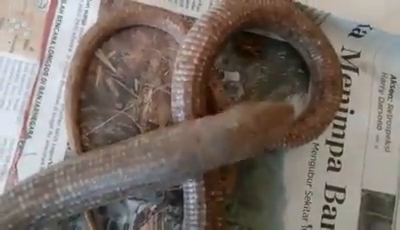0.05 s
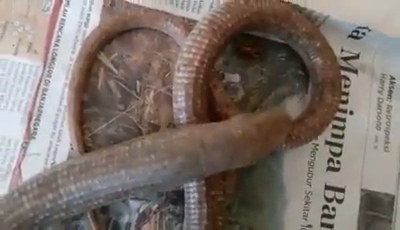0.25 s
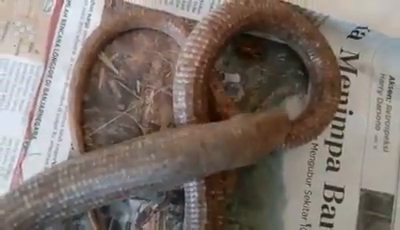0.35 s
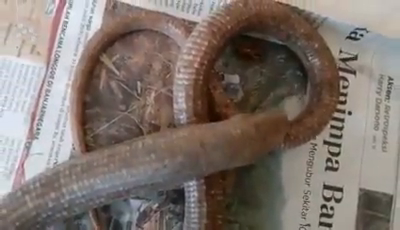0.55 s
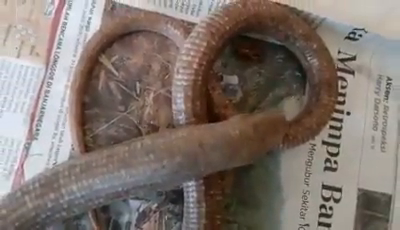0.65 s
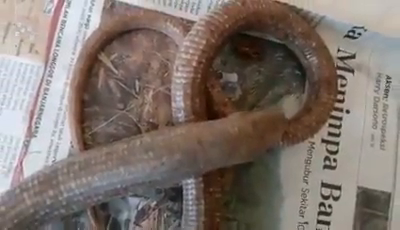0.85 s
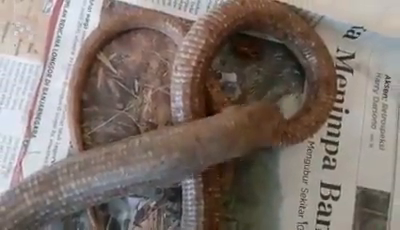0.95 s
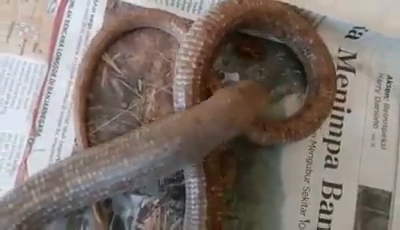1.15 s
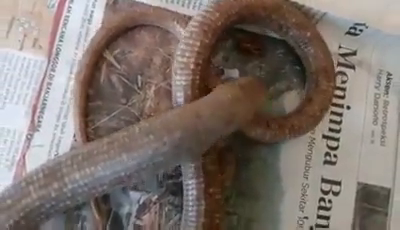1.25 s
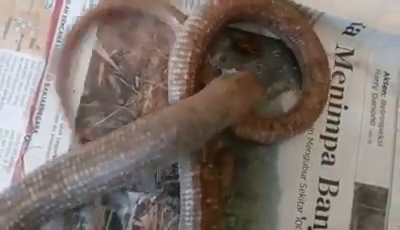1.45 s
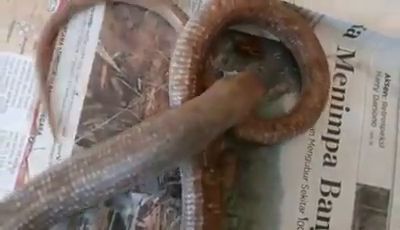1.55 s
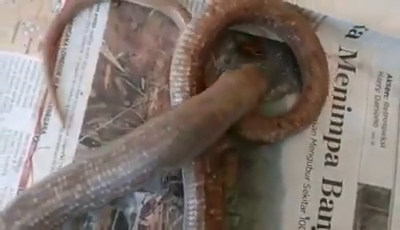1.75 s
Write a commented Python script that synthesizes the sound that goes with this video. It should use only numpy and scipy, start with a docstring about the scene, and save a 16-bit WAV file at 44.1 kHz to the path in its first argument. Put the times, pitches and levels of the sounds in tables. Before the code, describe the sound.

Newspaper crackles close by in a quiet room as a legless lizard tugs at its food. Light ticks build into sharp, crisp snaps, densest from about 0.3 to 0.7 seconds. The crackling thins, with another snap around 1 second and a few small ones after. From about 1.2 seconds the scaly body slides over the paper with a smoother hiss and faint low rub, peaking near 1.55 seconds, then easing.

```python
"""Paper crackles and snaps in short bursts, close by in a quiet room: a long legless lizard is
tugging at its food on a sheet of newspaper. Each buckling fold sends an impulse through the
resonances of the sheet, and tearing fibres add a fine hiss. Then the scaly body slides over the
paper, and friction makes a smoother hiss with a faint low rub."""
import sys
import numpy as np
from scipy import signal
from scipy.fft import rfft, irfft, next_fast_len
from scipy.io import wavfile
from scipy.ndimage import uniform_filter1d, minimum_filter1d

SR = 44100
rng = np.random.default_rng(int(sys.argv[2]) if len(sys.argv) > 2 else 0)


def store_pcm(level_fs):
    """Save levels as 16-bit WAV."""
    pcm = np.round(np.clip(level_fs, -1, 1) * 32767).astype(np.int16)
    wavfile.write(sys.argv[1], SR, np.atleast_2d(pcm).T)


N = 79380
TIME = np.arange(N) / SR

# Snaps of the paper. Each row: time in seconds, relative level in dB, extra low-mids in dB,
# extra fibre hiss in dB, decay time in seconds, pitch of the buckling fold in Hz.
SNAP_EVENTS = [(0.056, -21, -9, 3, 0.0012, 4500), (0.1658, -18.5, 2, 1, 0.0017, 3800),
               (0.2026, -20, -4, 6, 0.0027, 3610), (0.209, -12, 1, 1, 0.0009, 4530),
               (0.2506, -17, -6, -2, 0.001, 4640), (0.2639, -9.5, -3, 1, 0.0012, 4170),
               (0.2705, -9, 2, -3, 0.0009, 4350), (0.278, -11.5, 5, 3, 0.0037, 3120),
               (0.29, -11.5, -3, 2, 0.001, 4440), (0.325, -22.5, -2, -7, 0.0011, 4380),
               (0.3532, -6, -4, -1, 0.0041, 4500), (0.357, -6.5, 8, -7, 0.00057, 3930),
               (0.3721, -10, -11, -9, 0.00072, 4170), (0.374, -12, 2, -5, 0.0023, 4000),
               (0.386, -7.5, -2, -2, 0.0028, 4460), (0.4069, -8, 5.5, 6, 0.0013, 4460),
               (0.4157, -12, 4, 7, 0.002, 4400), (0.427, -5, 1.5, 5, 0.0024, 5350),
               (0.4335, -14, -2, -2, 0.0024, 4000), (0.451, -1.5, 1, -12, 0.0019, 4040),
               (0.453, 1.5, -5, 5, 0.0026, 4380), (0.4749, -2.5, -4, 5, 0.0025, 4600),
               (0.52, -15, 7, 5, 0.006, 4300), (0.5496, -15, 17, -6, 0.005, 4500),
               (0.555, -3.5, 2, -8, 0.0037, 5330), (0.558, -4.5, 1, -6, 0.0031, 4360),
               (0.567, -10, -8, -3, 0.0018, 3400), (0.573, -6, -3, -1, 0.0018, 3540),
               (0.6045, -14.5, 2, -3, 0.0012, 4470), (0.609, -13, 2, -3, 0.0016, 4300),
               (0.6194, -5, -2, -8, 0.0033, 4130), (0.627, -8.5, 13, -4, 0.0041, 4480),
               (0.633, -10, 11, 5, 0.0031, 4430), (0.6374, -13, 14.5, -7, 0.0055, 3670),
               (0.6528, -6, 7.5, 3, 0.0018, 4040), (0.663, -12, 3, 6, 0.0036, 4750),
               (0.689, -9.5, 6, 1, 0.0035, 3440), (0.694, -12, -7, 0, 0.0026, 4530),
               (0.726, -20, -10, -1, 0.005, 4350), (0.758, -18, -13, 3, 0.0014, 4600),
               (0.7906, -12, -1, -4, 0.0016, 5100), (0.7978, -19.5, -4, -10, 0.001, 4470),
               (0.844, -15.5, -8, -4, 0.0011, 4630), (0.8614, -18.5, -21, -1, 0.0016, 4450),
               (0.8895, -17.5, -21, -6, 0.0019, 4600), (0.9067, -28.5, -6, -5, 0.0007, 4690),
               (0.9258, -20.5, -16, -7, 0.0018, 4830), (0.9627, -19, -18, 3, 0.00049, 5060),
               (1.0053, -21, -3, 6, 0.002, 4400), (1.0172, -5, -7, -9, 0.0014, 4070),
               (1.021, -16, -9, -1, 0.0013, 4400), (1.0298, -1, -6, -7, 0.0025, 4100),
               (1.0603, -14, -7, 0, 0.0017, 4470), (1.0821, -15.5, -4, -12, 0.00073, 4160),
               (1.166, -15, 7, -8, 0.0025, 3530), (1.189, -14, -15, -10, 0.0011, 4650),
               (1.196, -14, -14.5, -5, 0.005, 4340), (1.205, -17, -7, 3, 0.0018, 4200),
               (1.2382, -19, -8, 14, 0.0018, 4510), (1.2968, -16.5, 6, 14, 0.003, 3870),
               (1.357, -32, -6, 24.5, 0.003, 4400)]

# Envelopes. Each row: time in seconds, level in dB.
CRUMPLE_LEVEL = [(0, -37), (.012, -34.5), (.07, -46), (.09, -46.5), (.158, -53.5), (.175, -37.5),
                 (.21, -28.5), (.25, -30.5), (.285, -37), (.30, -40), (.34, -43), (.38, -36), (.44, -27),
                 (.49, -33.5), (.54, -30.5), (.56, -22), (.595, -29), (.63, -22.5), (.645, -36.5),
                 (.665, -27), (.71, -42), (.78, -41.5), (.85, -40), (.95, -51.5), (.99, -39),
                 (1.055, -27.5), (1.10, -41), (1.18, -37), (1.2, -31), (1.295, -30), (1.32, -39.5),
                 (1.8, -61)]  # how hard the paper is crumpled
FIBRE_LEVEL = [(0, -62), (.17, -66), (.25, -47), (.33, -57.5), (.43, -44), (.5, -48.5), (.57, -46),
               (.68, -49), (.74, -61), (.99, -61), (1.05, -47.5), (1.12, -62.5), (1.24, -51), (1.3, -47),
               (1.32, -53), (1.37, -60), (1.8, -75)]  # airy treble over the rustle
SLIDE_LEVEL = [(0, -71), (1.08, -53), (1.2, -42), (1.31, -42.5), (1.39, -38.5), (1.465, -34.5),
               (1.495, -27), (1.514, -24), (1.546, -24), (1.563, -23), (1.59, -28), (1.622, -31),
               (1.635, -37.5), (1.8, -36)]  # scales moving over the sheet
PRESS_GAIN = [(1.44, 0), (1.515, 6), (1.55, -7.5), (1.568, 4), (1.6, -12.5)]  # two hard pushes lift the lower band of the scrape
RUB_LEVEL = [(0, -80), (1.1, -69), (1.25, -53.5), (1.55, -53), (1.8, -62)]  # the shifting body

# Spectral shapes. Each row: frequency in Hz, relative level in dB.
PAPER_SPECTRUM = [(50, -38), (120, -31), (300, -37), (600, -27.5), (950, -27.5), (1900, -19), (2700, -11),
                  (3500, -5), (4500, 0), (5500, -1.5), (6400, -14), (8500, -21), (9200, -32), (10400, -16),
                  (13500, -60), (16000, -61)]
FIBRE_SPECTRUM = [(3000, -25), (6000, -4), (8300, 9), (9200, 0), (10400, 4), (13500, -3), (16000, -23)]
PUFF_SPECTRUM = [(11000, 6), (14500, -11.5), (16000, -12)]
SLIDE_SPECTRUM = [(30, -61), (100, -26), (300, -17), (600, -26), (1150, -37), (1450, -13), (2200, -3.5),
                  (2900, -6.5), (3600, 1), (4400, -1), (5200, -9.5), (6500, -16.5), (8700, -24.5),
                  (9200, -37), (10400, -26.5), (13500, -30.5), (16000, -46)]
RUB_SPECTRUM = [(60, -14.5), (170, -21), (335, -2), (450, -12), (900, -17.5), (3000, -36)]
BUMP_SPECTRUM = [(100, -23), (300, -23), (450, -4), (650, -6), (1100, -24), (2500, -5.5), (6000, -48)]
AIR_SPECTRUM = [(20, -16), (50, -17), (80, -14), (140, -3), (260, 2), (420, -8), (1000, -10.5), (3000, -10),
                (8000, -27), (16000, -21.5)]

# Resonances of the sheet. Each row: centre in Hz, half-width in Hz, lift in dB.
CREASED_MODES = [(590, 20, 5.5), (1370, 32, 7.5), (1550, 39, 10), (2067, 110, 8), (2593, 102, 11),
                 (3228, 104, 10), (3590, 45, 6), (4186, 124, 2.5), (4565, 160, 7.5), (4880, 134, -6),
                 (5000, 110, 1), (6800, 150, 5)]
LOADED_MODES = [(2410, 103, 8), (2740, 41, 7), (3200, 150, 1.5), (3690, 65, 2.5), (4230, 130, 5.5)]  # under the body

# Faint hum in the room. Each row: frequency in Hz, level in dB.
HUM_TONES = [(100, -69), (143, -63.5)]


def paper(fibres_above_hz=8980):
    """Source and filter: snaps and crinkles excite the modes of one sheet, while its fibres hiss."""
    crinkles = level(CRUMPLE_LEVEL) * grains(per_s=4500, spread_db=3, clump_db=3.5, clumps_per_s=110)
    clicks, puffs = snaps()
    drive = split(dispersion(clicks) + crinkles, fibres_above_hz, "low")
    hiss = level(FIBRE_LEVEL) * grains(per_s=30000, spread_db=7.5, clump_db=6.5, clumps_per_s=110)
    tearing = colour(split(puffs, fibres_above_hz, "high"), PUFF_SPECTRUM)
    return colour(drive, PAPER_SPECTRUM, CREASED_MODES) + colour(hiss, FIBRE_SPECTRUM) + tearing


def snaps(boost_db=12.5, fibre_db=-21, low_mids_below_hz=2200):
    """Sudden release of elastic energy: each snap gives a click and a puff of hiss from torn fibres."""
    low_mids, clicks, puffs = np.zeros((3, N))
    half = int(.025 * SR)
    age = np.arange(-half, half) / SR
    main_band = signal.butter(2, [3000, 5500], "band", fs=SR, output="sos")
    for time_s, db, low_db, hiss_db, decay_s, fold_hz in SNAP_EVENTS:
        gain = from_db(db + boost_db)
        click = buckling_fold(age, decay_s, fold_hz)
        click *= gain / (3 * np.linalg.norm(signal.sosfilt(main_band, click + 1e-18)))
        puff = swell(age, lead_s=.0018, decay_s=.0033) * rng.standard_normal(len(age))
        span = slice(int(time_s * SR) - half, int(time_s * SR) + half)
        low_mids[span] += click * from_db(low_db)
        clicks[span] += click
        puffs[span] += puff / np.linalg.norm(puff) * gain * from_db(hiss_db + fibre_db)
    return split(low_mids, low_mids_below_hz, "low") + split(clicks, low_mids_below_hz, "high"), puffs


def buckling_fold(age, decay_s, fold_hz, width_hz=1000, fractures_per_s=7500, fracture_db=-2):
    """Buckling: an impulse amid a spray of tiny fractures rings the damped resonance of a fold."""
    envelope = from_db(fracture_db) * swell(age, lead_s=.00105, decay_s=decay_s)
    impulses = envelope * rng.standard_normal(len(age))
    impulses *= rng.random(len(age)) < fractures_per_s / SR
    impulses[len(age) // 2] = 1  # the main impulse, at age zero
    resonance = signal.iirpeak(fold_hz, fold_hz / width_hz, fs=SR)
    return impulses + signal.lfilter(*resonance, impulses + 1e-18)


def dispersion(x, centre_hz=4000, width_hz=1700):
    """Dispersion: bending waves travel at unequal speeds, so an all-pass spreads each click in time."""
    radius = np.exp(-np.pi * width_hz / SR)
    denominator = [1, -2 * radius * np.cos(2 * np.pi * centre_hz / SR), radius * radius]
    return signal.lfilter(denominator[::-1], denominator, x + 1e-18)


def sliding_scales(press_below_hz=2400, lowest_hz=85):
    """Friction: scales catch in a dense stream that deepens with pressure, over the body's low rub."""
    catches = level(SLIDE_LEVEL) * grains(per_s=20000, spread_db=2.1, clump_db=1.95, clumps_per_s=80)
    deep = level(PRESS_GAIN) * split(catches, press_below_hz, "low")
    bright = split(catches, press_below_hz, "high")
    scrape = colour(deep + bright, SLIDE_SPECTRUM, LOADED_MODES)
    rub = colour(level(RUB_LEVEL) * rng.standard_normal(N), RUB_SPECTRUM)
    return split(scrape + rub, lowest_hz, "high")  # the thin sheet radiates no deep bass


def bump(start_s=.304, db=-32, t60_s=.024):
    """Heavy damping: one soft knock on the sheet dies away too quickly to have a pitch."""
    fall_db = 60 * np.minimum(np.abs(TIME - start_s) / t60_s, 3)
    envelope = (TIME > start_s) * from_db(db - fall_db)
    return colour(envelope * rng.standard_normal(N), BUMP_SPECTRUM)


def reflections(x, t60_s, echoes_per_s=2600):
    """Reverberation: scattered echoes of unit total energy begin after 1 ms and decay exponentially."""
    echoes = rng.standard_normal(N) * (rng.random(N) < echoes_per_s / SR)
    echoes *= (TIME > .001) * from_db(-60 * TIME / t60_s)
    return signal.fftconvolve(x, echoes / np.sqrt(np.sum(echoes ** 2) + 1e-20))[:N]


def room_noise(air_db=-51):
    """Ambient noise: a steady broadband murmur of air with a faint hum of pure tones."""
    hum = sum(from_db(db) * np.sin(2 * np.pi * (hz * TIME + rng.random())) for hz, db in HUM_TONES)
    return from_db(air_db) * colour(rng.standard_normal(N), AIR_SPECTRUM) + hum


def grains(per_s, spread_db, clump_db, clumps_per_s):
    """Shot noise: tiny random clicks whose strength swells in clumps, held near unit rms."""
    sizes = from_db(spread_db * np.minimum(rng.exponential(1, N), 4)) * rng.choice([-1, 1], N)
    clumps = np.interp(TIME * clumps_per_s, np.arange(N), rng.standard_normal(N))
    clicks = sizes * (rng.random(N) < per_s / SR) * from_db(clump_db * clumps)
    local_power = np.abs(uniform_filter1d(clicks ** 2, size=1500))
    return clicks / np.sqrt(local_power + 1e-9)


def colour(x, spectrum, modes=()):
    """Minimum-phase filtering at unit energy: a broad spectral shape with resonances on top."""
    size = 2 * next_fast_len(N)
    hz = np.maximum(np.arange(size // 2 + 1) * SR / size, 1)
    points_hz, points_db = np.transpose(spectrum)
    db = np.interp(np.log(hz), np.log(points_hz), points_db)
    for centre, width, lift in modes:
        db += lift / (1 + ((hz - centre) / width) ** 2)
    gain = from_db(db)
    gain /= np.sqrt(np.mean(gain ** 2) + 1e-20)
    cepstrum = irfft(np.log(gain))
    cepstrum[1:size // 2] *= 2  # folding onto positive time makes the filter causal
    cepstrum[size // 2 + 1:] = 0
    return irfft(rfft(x, size) * np.exp(rfft(cepstrum)))[:N]


def split(x, hz, side):
    """Band separation: one side of a fourth-order crossover."""
    sos = signal.butter(2, hz, side, fs=SR, output="sos")
    return signal.sosfilt(sos, signal.sosfilt(sos, x + 1e-18))


def swell(age, lead_s, decay_s):
    """Exponential growth and decay, peaking at age zero."""
    return np.exp(-np.minimum(np.maximum(age / decay_s, -age / lead_s), 40))


def level(rows):
    """Amplitude envelope, interpolated in decibels."""
    return from_db(np.interp(TIME, *np.transpose(rows)))


def from_db(db):
    """Amplitude ratio of a level in decibels."""
    return 10 ** (np.asarray(db) / 20)


def scene(near_db=-12, room_db=-18.5):
    """Superposition: direct sound, echoes from nearby surfaces and the room, and ambient noise."""
    direct = paper() + sliding_scales() + bump()
    near = from_db(near_db) * reflections(direct, t60_s=.03)
    room = from_db(room_db) * reflections(direct, t60_s=.62)
    return (direct + near + room + room_noise())[None]


def record(dry, ceiling=.92, window_samples=89, cutoff_hz=15650):
    """Peak limiting: the gain dips at any peak above the ceiling; a steep low-pass then cuts the top."""
    allowed_gain = minimum_filter1d(ceiling / np.maximum(np.abs(dry), ceiling), size=window_samples)
    limited = dry * uniform_filter1d(allowed_gain, size=window_samples)
    return signal.sosfilt(signal.ellip(10, .1, 80, cutoff_hz, fs=SR, output="sos"), limited)


dry = scene()
out = record(dry)
store_pcm(out)
```